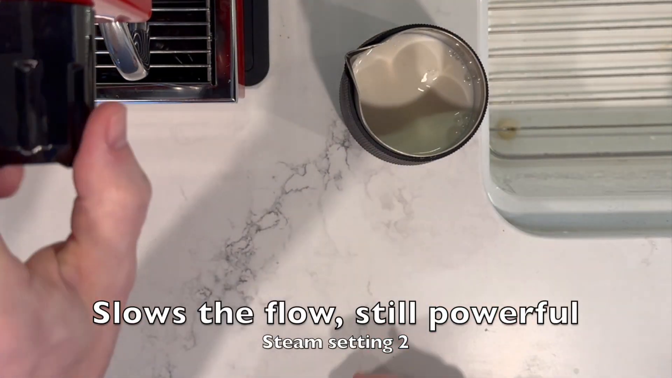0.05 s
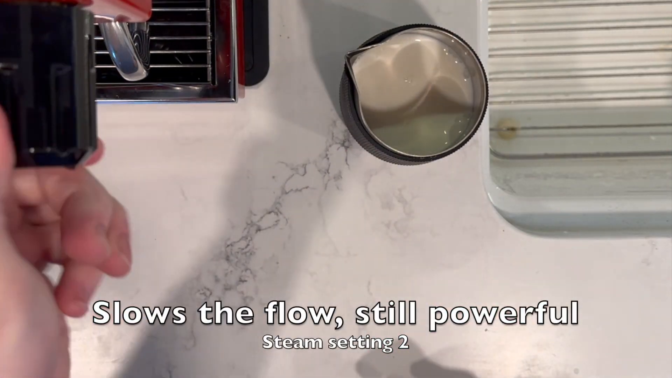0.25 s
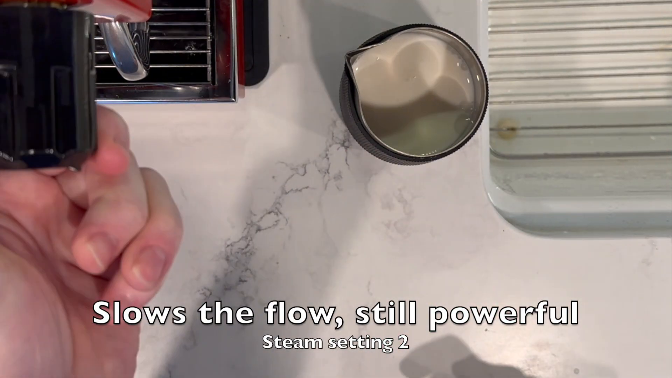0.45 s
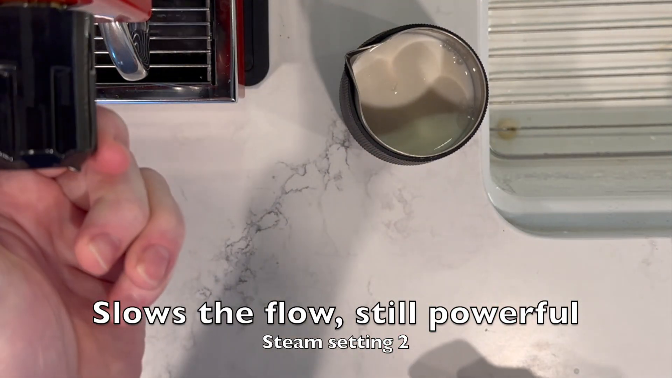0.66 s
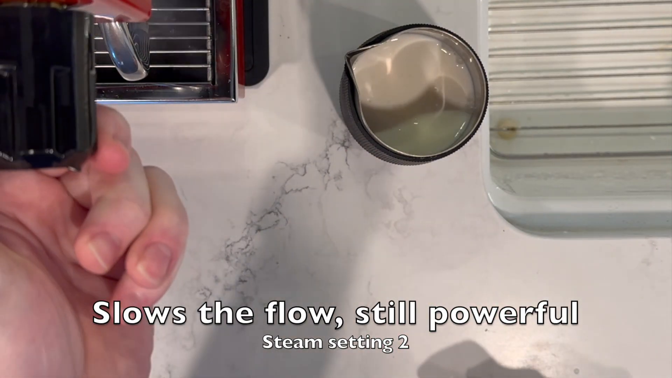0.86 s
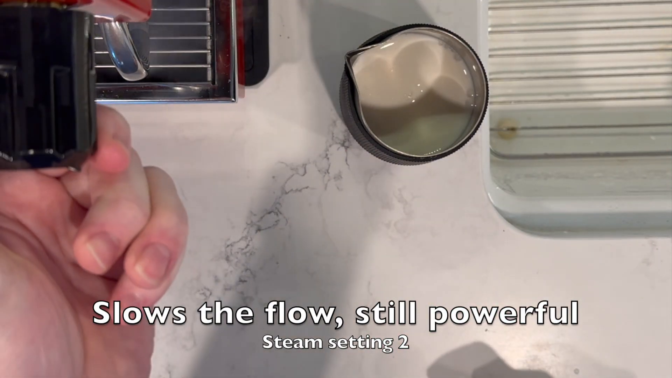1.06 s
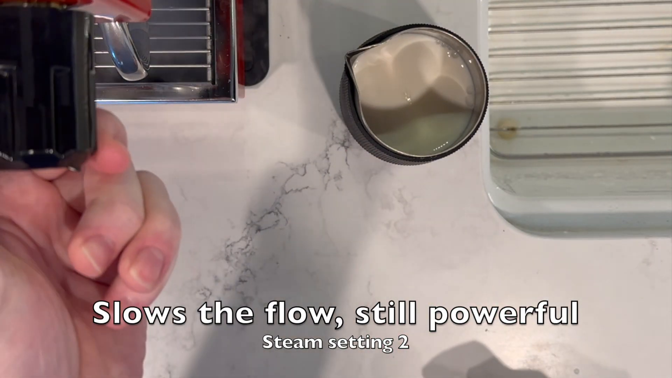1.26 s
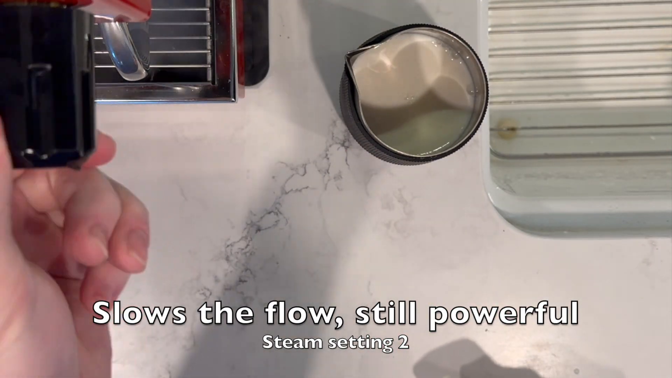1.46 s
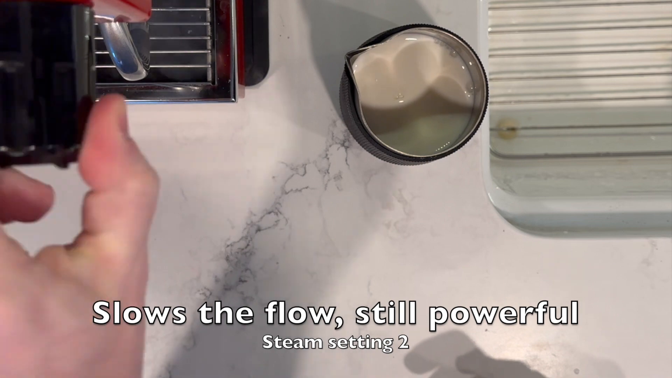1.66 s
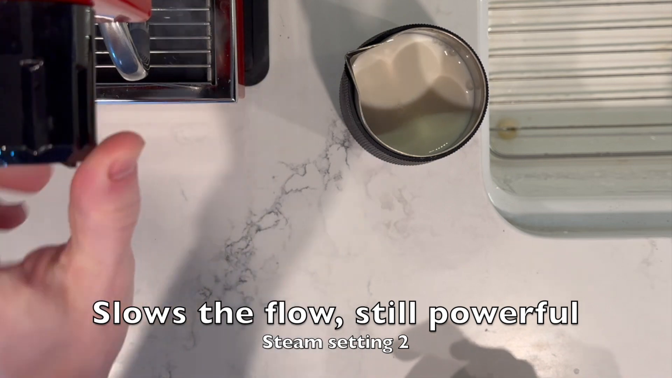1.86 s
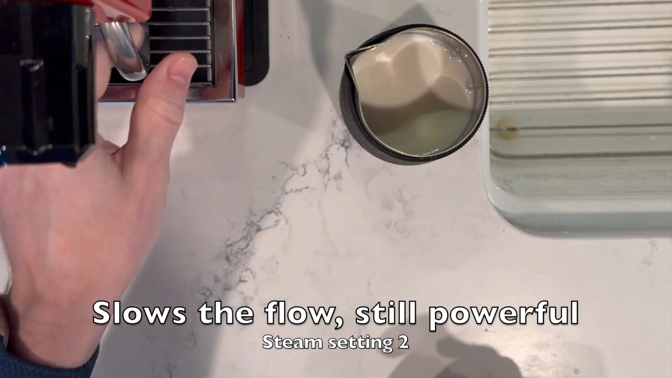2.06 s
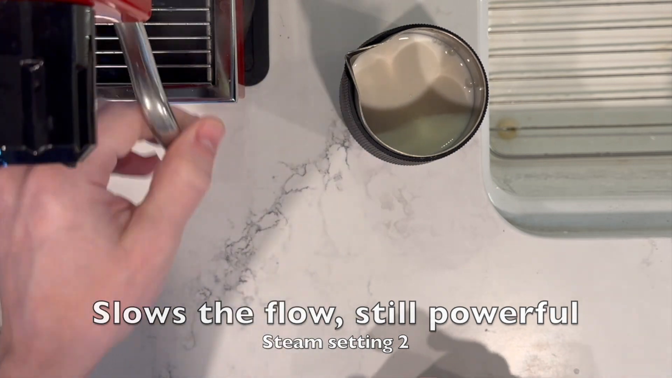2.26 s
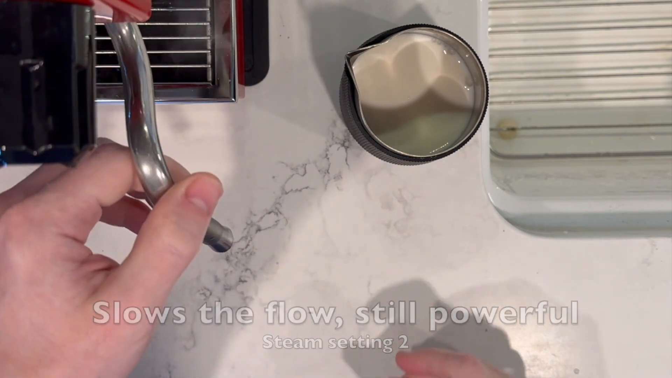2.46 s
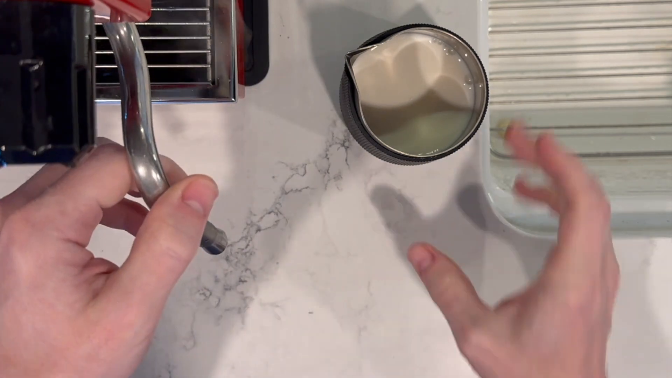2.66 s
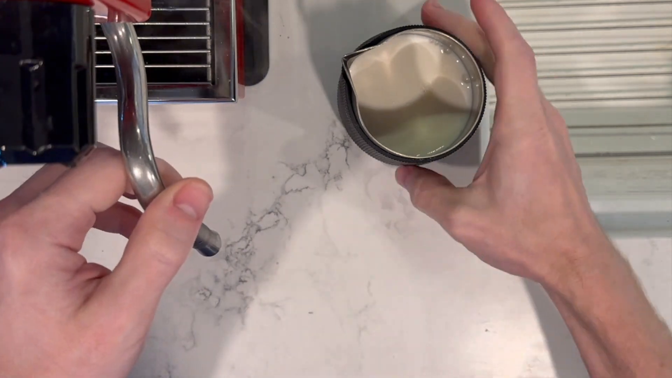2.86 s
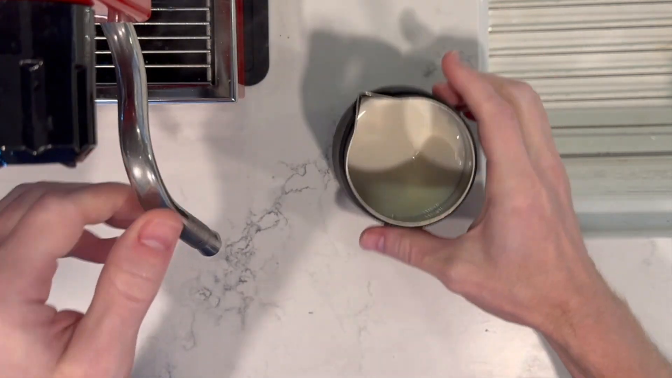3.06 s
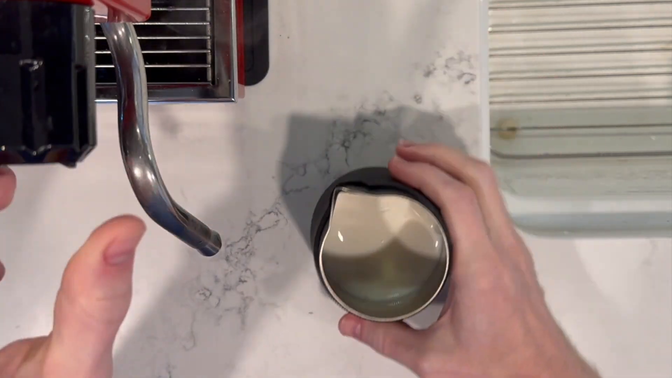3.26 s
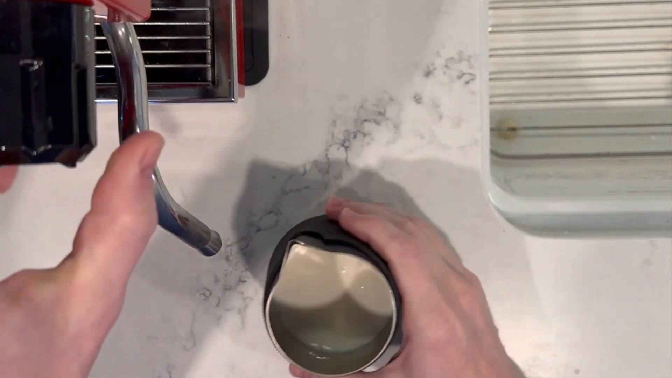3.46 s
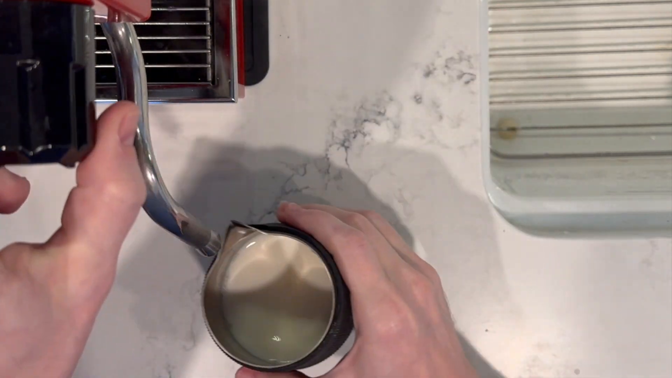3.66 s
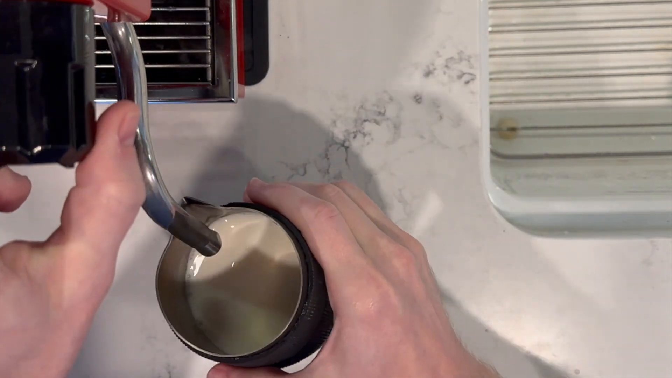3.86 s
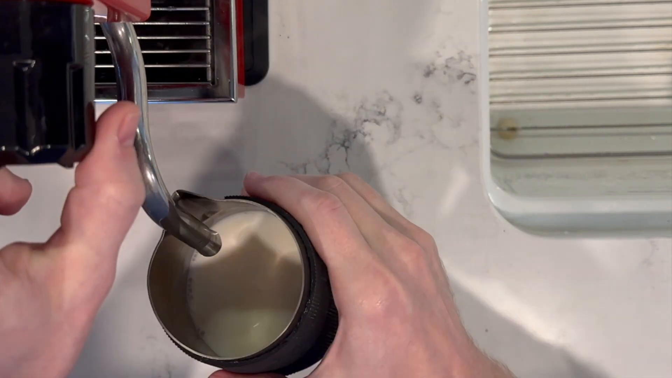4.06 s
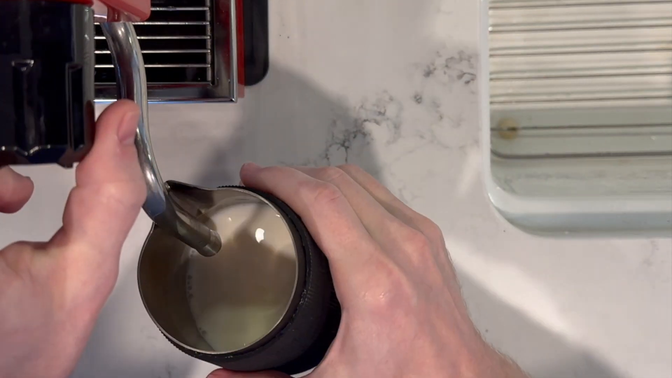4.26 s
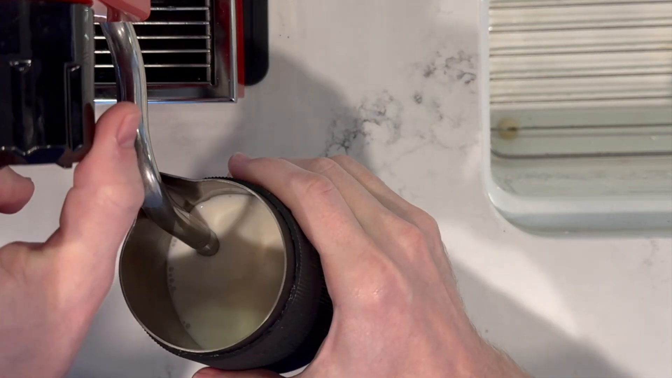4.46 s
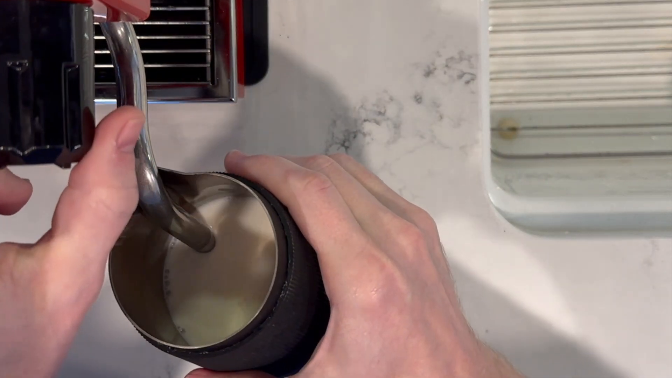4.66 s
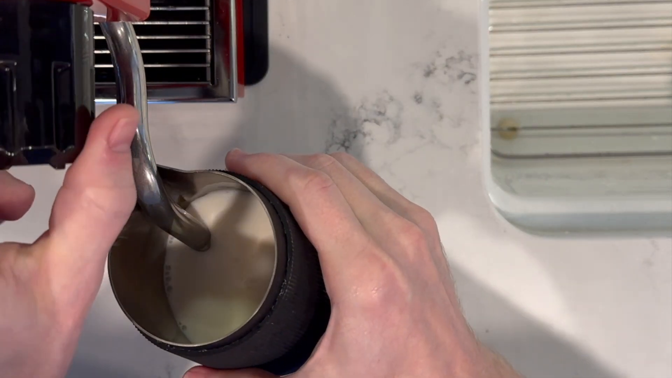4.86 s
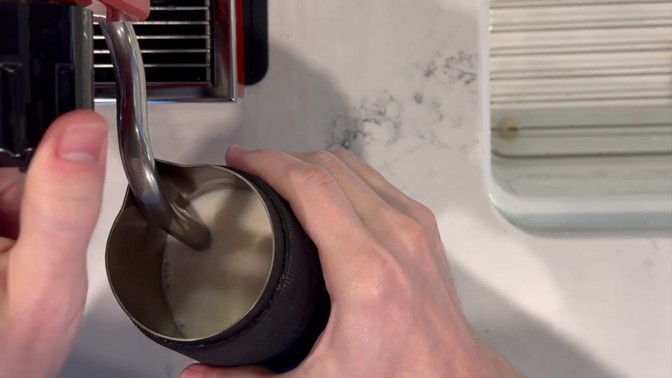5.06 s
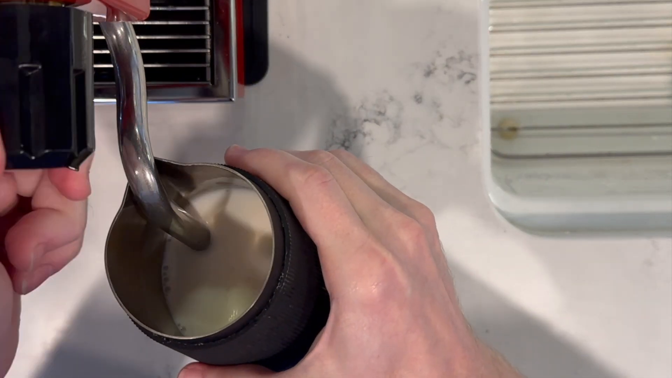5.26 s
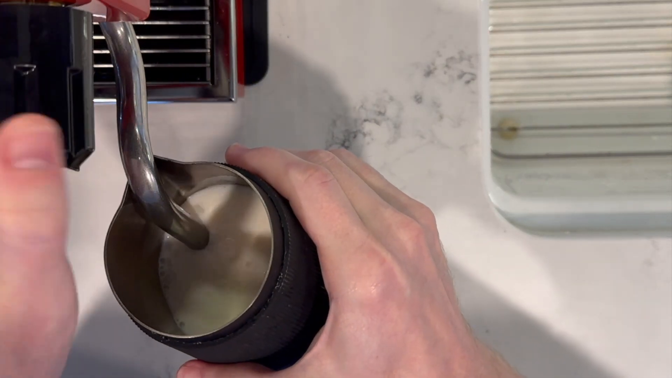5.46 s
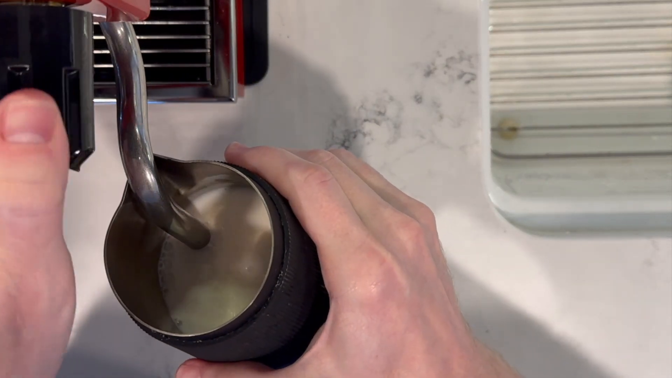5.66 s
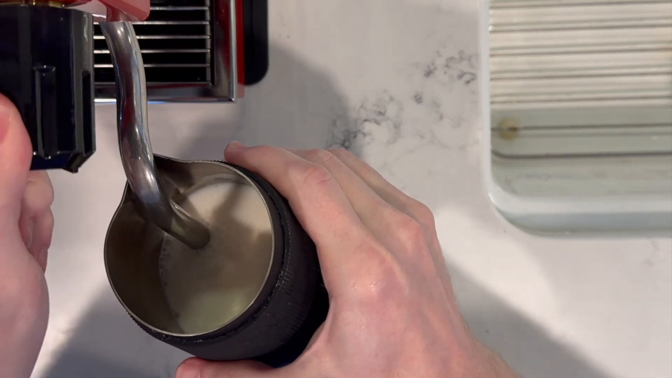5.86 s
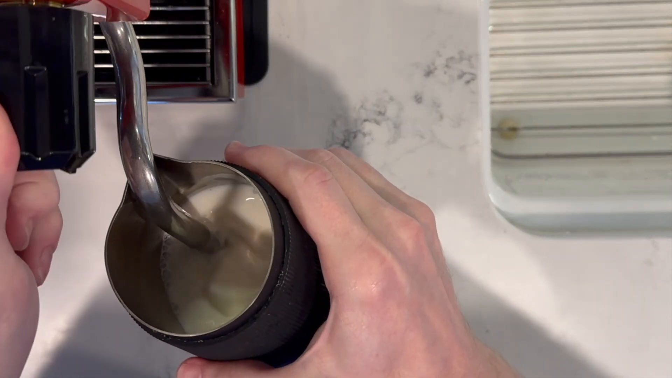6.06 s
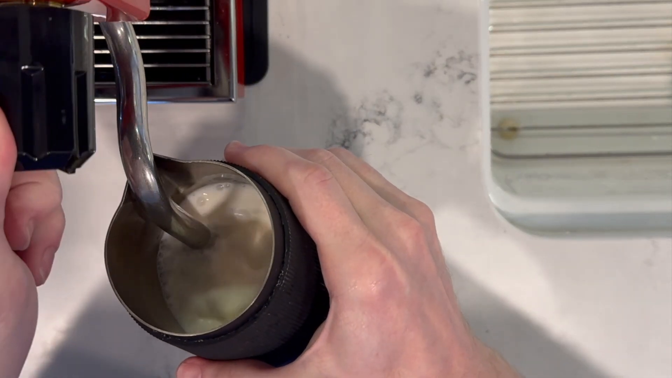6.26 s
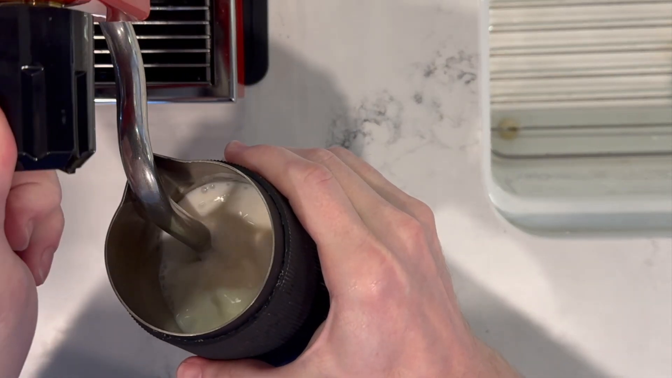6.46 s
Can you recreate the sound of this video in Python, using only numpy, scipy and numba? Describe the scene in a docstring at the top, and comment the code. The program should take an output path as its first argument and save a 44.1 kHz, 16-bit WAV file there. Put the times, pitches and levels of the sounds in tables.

```python
"""A kitchen, just above the counter: an espresso machine. A knob clicks, the steam wand sputters water and is purged
into the drip tray (filtered noise), a steel pitcher slides over (slip grains through its base modes) and the wand
knocks it (decaying modes). Then steam enters the liquid: collapsing bubbles, grains through moving resonances, rise
from a gurgle to a screech, ring the air in the pitcher, and the tip spits bursts of noise at the surface."""
import sys
import numpy as np
from scipy import signal
from scipy.fft import rfft, irfft
from scipy.io import wavfile
from scipy.ndimage import uniform_filter1d
from numba import njit

SR = 44100
rng = np.random.default_rng(int(sys.argv[2]) if len(sys.argv) > 2 else 0)


def unload_audio(sound):
    """Save the sound as a 16-bit wav file, at the path given as the first command line argument."""
    columns = np.transpose(np.atleast_2d(sound))
    # keep every value between -1 and 1, then stretch to whole-number steps
    steps = np.round(np.clip(columns, -1, 1) * 32767)
    wavfile.write(sys.argv[1], SR, steps.astype(np.int16))


N = 287085
TIME_S = np.arange(N) / SR


def undb(db):
    """Decibels to gain."""
    return 10 ** (np.asarray(db) / 20)


def unit(x):
    """Scale to rms 1."""
    return x / np.sqrt(np.mean(x ** 2))


def noise():
    """White noise."""
    return rng.standard_normal(N)


def curves(table):
    """Columns of a timed table, interpolated to every sample."""
    t_s, *columns = np.transpose(table)
    return [np.interp(TIME_S, t_s, column) for column in columns]


def over_hz(points, hz):
    """Read (f/Hz, value) points on a log-frequency axis."""
    f_hz, value = np.transpose(points)
    return np.interp(np.log(hz + 1), np.log(f_hz), value)


def colour(x, points, size=4096):
    """Causal minimum-phase filter with the given (f/Hz, gain/dB) response."""
    log_gain = np.log(undb(over_hz(points, np.fft.rfftfreq(size, 1 / SR))))
    cepstrum = irfft(log_gain)
    # fold the cepstrum onto positive time
    cepstrum[1:size // 2] *= 2
    cepstrum[size // 2 + 1:] = 0
    impulse = irfft(np.exp(rfft(cepstrum)))
    return signal.fftconvolve(x, impulse)[:len(x)]


@njit
def svf(x, hz, width_hz):
    """State-variable band-pass whose centre and width move."""
    y, b, l = np.empty(len(x)), 0., 0.
    for i in range(len(x)):
        g, k = np.tan(np.pi * hz[i] / SR), width_hz[i] / hz[i]
        v = (b + g * (x[i] - l)) / (1 + g * (g + k))
        b, l, y[i] = 2 * v - b, l + 2 * g * v, k * v
    return y


def band(x, hz, width_hz):
    """One resonance, fixed or moving."""
    ones = np.ones(len(x))
    return svf(x + 1e-18, hz * ones, width_hz * ones)  # offset avoids denormals


def band2(x, hz, width_hz):
    """Two equal resonances in series: steeper skirts."""
    return band(band(x, hz, width_hz), hz, width_hz)


def walk(points_per_s):
    """Smooth random wander, rms 1."""
    points = rng.standard_normal(2048)
    return unit(np.interp(TIME_S * points_per_s % len(points), np.arange(len(points)), points))


def grains(per_s, spread_db):
    """Random tiny impulses of uneven size, rms 1."""
    hits = rng.random(N) < per_s / SR
    return unit(hits * noise() * undb(spread_db * noise()))


def gate(start_s, length_s, rise_s, fall_s):
    """Opens at start, holds, then dies away."""
    opening = np.clip((TIME_S - start_s) / rise_s, 0, 1)
    return opening * np.exp(-np.maximum(TIME_S - start_s - length_s, 0) / fall_s)


def swell(peak_s, rise_db_per_s, fall_db_per_s):
    """Gain that grows steadily up to a moment and fades after it."""
    before_s, after_s = np.maximum(peak_s - TIME_S, 0), np.maximum(TIME_S - peak_s, 0)
    return undb(-rise_db_per_s * before_s - fall_db_per_s * after_s)


def add(track, start_s, x):
    """Mix a short sound in at a time."""
    i = int(start_s * SR)
    track[i:i + len(x)] += x[:N - i]


def click(hz, decay_s=0.0026, relative_width=0.36):
    """Brief noise burst around one pitch."""
    t_s = TIME_S[:SR // 5]
    return unit(band(rng.standard_normal(len(t_s)), hz, relative_width * hz)) * np.exp(-t_s / decay_s)


# plume part unrelated between left and right: f/Hz, relative level/dB
PLUME_WIDTH = [(150, -25.5), (700, -6.5), (2000, -9.5), (5000, 0.5), (8000, -17.5), (11000, -22),
               (15000, -15)]


def wide(source, width_db=0):
    """A plume is no point: its eddies reach left and right partly unrelated."""
    common = source()
    return common + undb(width_db) * colour(source(), PLUME_WIDTH) * np.array([[1], [-1]])


# reverberation: f/Hz, T60/s
KITCHEN_T60 = [(100, 0.44), (1000, 0.74), (5000, 0.61), (10000, 0.45), (16000, 0.319)]
# lead of the left microphone port over the right: f/Hz, phase/rad
PORT_PHASE = [(400, 0), (1000, .7), (2000, .8), (2900, 2.6), (4800, 4), (6500, 6.3), (8300, 8.9),
              (10300, 6.6), (13200, 6.2), (15000, 4.5)]
NEAR_DECAY_S = .004


def kitchen(x, side, near_db, room_db, shared_hz=750):
    """Direct sound, quick reflections off counter and machine, room tail; both channels share the bass."""
    t_s = TIME_S[:SR * 3 // 4]
    hz = np.fft.rfftfreq(len(t_s), 1 / SR)
    edges_hz = np.linspace(0, SR / 2, 32)
    near, late = rng.standard_normal((2, 2, len(t_s)))
    late, tail = rfft(late), 0
    apart = hz / np.hypot(hz, shared_hz)
    for lo, hi in zip(edges_hz, edges_hz[1:]):
        tau_s = over_hz(KITCHEN_T60, (lo + hi) / 2) / np.log(1000)
        tail = tail + irfft(late * ((hz >= lo) & (hz < hi)), len(t_s)) * np.exp(-t_s / tau_s)
    tail = tail * np.minimum(t_s / 0.006, 1) * np.sqrt(25 / SR)
    reflections = rfft(near * np.exp(-t_s / NEAR_DECAY_S)) * np.sqrt(2 / NEAR_DECAY_S / SR)
    early = 1 + undb(near_db) * reflections * apart
    # reflections ripple the spectrum finely but leave its broad shape
    early = early / np.sqrt(uniform_filter1d(np.abs(early) ** 2, size=50, axis=1))
    room = undb(room_db) * apart
    paths = (early + room * rfft(tail)) / np.hypot(1, room)
    paths = paths * undb(np.array([[.5], [-.5]]) * over_hz(side, hz))
    paths[1] *= np.exp(-1j * over_hz(PORT_PHASE, hz))  # right port lags
    lead = 32  # samples kept ahead of the direct sound
    response = np.roll(irfft(paths, len(t_s)), lead, axis=1)[:, :-SR // 10]
    return signal.fftconvolve(np.atleast_2d(x), response, axes=1)[:, lead:lead + N]


# room floor spectrum: f/Hz, relative level/dB
FLOOR = [(20, -30.5), (55, 1), (90, 1.5), (170, -7.5), (220, -16.5), (290, -16.5), (340, -20.5),
         (720, -27.5), (1000, -33.5), (1400, -31.5), (1700, -40.5), (3200, -46), (6500, -44.5),
         (10000, -62.5), (16000, -53.5)]
FLOOR_DB = -49.5


def background(apart_hz=600):
    """Low room rumble, alike in both channels, under a faint wide hiss."""
    mid, side = colour(noise(), FLOOR), colour(noise(), FLOOR)
    side = signal.sosfilt(signal.butter(1, apart_hz, "high", fs=SR, output="sos"), side)
    return undb(FLOOR_DB) * (mid + side * np.array([[1], [-1]])) / np.std(mid)


# knob click spectrum: f/Hz, relative level/dB
KNOB = [(300, -11), (1000, -19), (1700, -14), (2900, 1), (3900, -4.5), (5000, -10), (6300, -28), (8400, -2),
        (10000, -8), (12000, -14), (14000, -9), (15600, -9)]
KNOB_S, KNOB_DB, KNOB_DECAY_S = .1135, -34, 0.0014


def knob():
    """One dry plastic click as the valve knob leaves its seat."""
    return undb(KNOB_DB) * gate(KNOB_S, 0.00055, 0.00045, KNOB_DECAY_S) * unit(colour(noise(), KNOB))


# wand joint ticks: t/s, relative level/dB, f/Hz
TICKS = [(2.1258, -69, 5520), (2.218, -70, 13500), (2.236, -69, 10550), (3.624, -62.5, 5180),
         (4.004, -66, 9500), (4.2035, -52.5, 6700), (4.211, -56, 5100), (4.4648, -62, 3550),
         (4.684, -60.5, 4380), (4.8063, -65, 6840), (4.944, -54.5, 5960), (5.02, -63, 13100)]
# wand modes: f/Hz, relative level/dB, T60/s
WAND = [(4400, 3, 0.067), (5420, 9, 0.11), (7000, 2, .05)]
# hands moving the wand: t/s, length/s, level/dB
HANDLING = [(1.915, .07, -79), (2.09, 0.15, -76), (2.409, .05, -76), (3.859, 1.23, -80)]


def ticks(tick_db=9.0, ring_db=-19):
    """Small bright clicks ring the wand; fainter ones come while the hands move it."""
    out, t_s = np.zeros(N), TIME_S[:SR // 5]
    ring = sum(undb(ring_db + db - 60 * t_s / t60_s) * np.sin(2 * np.pi * hz * t_s) for hz, db, t60_s in WAND)
    for start_s, db, hz in TICKS:
        add(out, start_s, undb(db + tick_db) * (click(hz) + ring))
    handled = sum(undb(db) * gate(start_s, length_s, 0.011, .03) for start_s, length_s, db in HANDLING)
    return out + handled * unit(band(grains(220, 1.3), 10500, 7000))


# pitcher base modes: f/Hz, nominal width/Hz, relative level/dB
BASE = [(534, 154, 2), (710, 105, 1.5), (894, 260, -3), (1190, 89, -11), (2270, 110, -6), (3770, 300, -13),
        (5000, 250, -14), (5950, 250, -16), (7000, 350, -18), (8500, 800, -17.5), (11160, 1000, -18.5),
        (13800, 900, -19.5)]
# SLIDE_LENGTH_S: until the pitcher is lifted; rise and fall: speeding up, slowing down
SLIDE_S, SLIDE_LENGTH_S, SLIDE_RISE_S, SLIDE_FALL_S = 2.892, 0.48, 0.091, 0.14


def slide(slide_db=-58.5, judder_db=1.4, drift=0.0086, flutter_db=2.5):
    """Dense slips of steel on stone ring the pitcher base; each mode flutters as the contact shifts."""
    slips = grains(3000, 1.3) * undb(judder_db * walk(24.77))
    grip = np.exp(drift * walk(9.8))
    ring = 0
    for hz, width_hz, db in BASE:
        mode = band(band(slips, hz * grip, 1.4 * width_hz), hz * grip, 2.0 * width_hz)
        ring = ring + undb(db + flutter_db * walk(35)) * mode
    return undb(slide_db) * unit(ring) * gate(SLIDE_S, SLIDE_LENGTH_S, SLIDE_RISE_S, SLIDE_FALL_S)


# wand-pitcher contacts: t/s, relative level/dB, treble tilt/(dB/octave), crack decay/s, relative steel ring/dB
KNOCKS = [(2.471, -61, 2.5, 0.0038, -8.5), (4.079, -47, 1.5, 0.0078, -13), (4.085, -51.5, -2, 0.016, 0.5),
          (4.534, -36.5, -2, 0.012, -18), (4.541, -39.5, -2, 0.012, -1.5), (5.262, -44.5, -2, 0.033, -13)]
# steel modes of wand and pitcher: f/Hz, relative level/dB, T60/s
STEEL = [(575, 9.5, 0.14), (721, -3, .18), (867, 7, 0.15), (929, 0, 0.25), (1010, -1, 0.2), (1077, 2, 0.18),
         (1687, 2, 0.07), (2210, 1.5, 0.09), (2750, -15, 0.38), (2780, 9, 0.077), (2944, -1, 0.12),
         (3350, -9, 0.13), (4630, 2, 0.06), (5240, -15, 0.22), (6600, -8, .13)]
# crack spectrum: f/Hz, relative level/dB
CRACK = [(150, -18), (400, -21), (590, 0), (740, -4), (1000, -9), (1350, -13.5), (1750, -9.5),
         (2900, -11.5), (4500, -4.5), (6000, -13), (9000, -14.5), (12000, -21.5), (16000, -26)]
# dull low bumps: a soft thud before the first sputter, thuds and scuffs of hands and pitcher,
# the thump of a spit: t/s, length/s, level/dB, f/Hz
BUMPS = [(0.296, 0.024, -53, 770), (2.47, 0.023, -51, 877), (2.475, 0.055, -47, 189),
         (3.499, 0.012, -61.5, 1660), (3.511, 0.036, -55, 606), (4.082, 0.039, -50, 930),
         (4.085, 0.027, -56, 540), (6.422, 0.017, -42, 177)]


def knocks(ring_db=-4, crack_db=8):
    """Each contact cracks briefly and rings the steel; dull bumps are added."""
    out, t_s = np.zeros(N), TIME_S[:SR // 2]
    for start_s, db, tilt_db, crack_s, steel_db in KNOCKS:
        ring = 0
        for hz, mode_db, t60_s in STEEL:
            # grip and point of contact change each mode's strength
            decay = undb(mode_db + 2 * rng.standard_normal() - 60 * t_s / t60_s)
            ring = ring + decay * np.sin(2 * np.pi * (hz * t_s + rng.random()))
        crack = unit(colour(rng.standard_normal(len(t_s)), CRACK)) * np.exp(-t_s / crack_s)
        blow = undb(ring_db + steel_db) * ring + undb(crack_db) * crack
        blow = blow * np.minimum(t_s / (0.071 * crack_s), 1)
        tilt = [(hz, tilt_db * np.log2(hz / 1500)) for hz in (300, 9000)]
        add(out, start_s, undb(db) * colour(blow, tilt))
    for start_s, length_s, db, hz in BUMPS:
        out += undb(db) * gate(start_s, length_s, 0.003, 0.011) * unit(band2(noise(), hz, 0.51 * hz))
    return out


# jet hiss and tray roar spectra: f/Hz, relative level/dB
JET = [(900, -38), (1800, -12.5), (2500, -10), (2950, -4.5), (3300, 3), (3650, -6), (4100, 2), (5000, -4),
       (6300, -0.5), (7500, 2.5), (8700, 2), (10000, 5.5), (12300, -1.5), (14000, 3), (15600, 1)]
TRAY = [(29, -48.5), (50, -12), (90, -1.5), (140, -7.5), (200, -5.5), (253, -11.5), (295, -1.5), (349, -5),
        (420, -3.5), (510, -8.5), (610, -7), (760, -10.5), (930, -11.5), (1140, -4.5), (1290, 1), (1390, 0),
        (1510, -3), (1820, -11), (2400, -22), (3120, -46.5), (5280, -120)]
# condensed water spat out: t/s, length/s, relative level/dB
SPUTTERS = [(0.314, 0.024, -37), (0.346, 0.011, -28), (0.374, 0.014, -27.5), (0.404, 0.012, -26.5),
            (0.47, 0.018, -26.5)]
# water slugs choking the hiss: t/s, length/s, depth/dB
CHOKES = [(0.425, 0.039, -5), (0.59, 0.018, -11.5)]
# valve cracked open, turned up, shut; flow time constant, closing time
CRACKED_S, TURNED_S, SHUT_S = .351, 0.61, 1.556
BUILD_S, SHUTTING_S = 0.17, 0.16
CRACKED_DB, OPEN_DB = -29, -18.5


def purge(tray_db=-9.0, weak_roar_db=-2.5, flutter_db=1.53, buffet_db=2.0, sputter_db=-2, rush_db=5):
    """Wet spurts, then a dry jet that hisses at the tip and roars where it hits the drip tray."""
    throttled = np.exp(-np.maximum(TIME_S - TURNED_S, 0) / BUILD_S)
    valve = gate(CRACKED_S, 2, 0.0018, .01) * np.clip((SHUT_S - TIME_S) / SHUTTING_S, 0, 1)
    flow = valve * undb(OPEN_DB + (CRACKED_DB - OPEN_DB) * throttled)
    choked_db = sum(db * gate(start_s, length_s, 0.0041, 0.0039) for start_s, length_s, db in CHOKES)
    sputter = sum(undb(db) * gate(start_s, length_s, 0.0037, 0.0038) for start_s, length_s, db in SPUTTERS)
    hiss = undb(choked_db + flutter_db * walk(50)) * unit(colour(noise(), JET))
    # a throttled jet barely reaches the tray
    roar_db = tray_db + weak_roar_db * throttled ** 2 + buffet_db * walk(70.1)
    roar = undb(roar_db) * unit(colour(noise(), TRAY))
    # the wide turbulent plume ends up as flow squared
    rush = undb(rush_db) * flow * unit(band(noise(), 2000, 1513))
    droplets = unit(colour(grains(12000, 6.0), JET)) + undb(-11.5) * unit(colour(noise(), TRAY))
    return flow * (hiss + roar + rush) + undb(sputter_db) * sputter * droplets


# droplet bursts: t/s, relative level/dB, f/Hz
POPS = [(6.031, -21, 6540), (6.047, -21, 13800), (6.09, -21, 9300), (6.1275, -21, 3000),
        (6.3232, -26, 2980), (6.356, -21.5, 3850), (6.4537, -15.5, 13900), (6.4812, -21, 6150),
        (6.492, -24, 5500)]


def pops(pop_db=3):
    """Single droplets burst above the milk."""
    out = np.zeros(N)
    for start_s, db, hz in POPS:
        add(out, start_s, undb(db + pop_db) * click(hz))
    return out


# a tip hole comes clear: t/s, length/s, relative level/dB
WHISTLES = [(6.026, .06, -32), (6.043, .005, -23), (6.127, .005, -23), (6.146, .008, -28),
            (6.304, .008, -31), (6.434, .008, -20), (6.483, 0.013, -29)]
WHISTLE_HZ, WHISTLE_WIDTH_HZ = 14544, 600


def whistles():
    """Thin, very high edge tones of the bare steam holes."""
    bare = sum(undb(db) * gate(start_s, length_s, 0.002, 0.003) for start_s, length_s, db in WHISTLES)
    return bare * unit(band2(noise(), WHISTLE_HZ, WHISTLE_WIDTH_HZ))


# large bubbles, each pumping one pitcher air mode: t/s, relative level/dB, f/Hz
GULPS = [(5.551, -33.5, 820), (5.597, -25.5, 860), (5.662, -24.5, 1314), (5.703, -27, 1325),
         (5.735, -27, 885), (5.752, -25, 1315), (5.793, -23, 1322), (5.845, -31, 1325), (5.985, -31, 1327),
         (6.151, -35, 854), (6.21, -34.5, 846), (6.455, -30.5, 880)]
GULP_S = 0.011  # swell and fade


def gulps(waver=0.012):
    """Each large bubble swells one air mode into a short hollow note."""
    warped_s = np.cumsum(np.exp(waver * walk(60))) / SR
    out = 0
    for peak_s, db, hz in GULPS:
        envelope = np.exp(-((TIME_S - peak_s) / GULP_S) ** 2)
        out = out + undb(db) * envelope * np.sin(2 * np.pi * hz * warped_s)
    return out


# tip breaks the surface: t/s, length/s, relative level/dB, wet gush relative to spray/dB
SPITS = [(6.011, 0.09, -30, -1), (6.118, 0.039, -34, 0), (6.305, 0.0083, -34, -17),
         (6.354, 0.017, -24.5, -5.5), (6.427, 0.038, -23.5, -47), (6.476, 0.023, -29, -2)]


def spitting():
    """Strength of the steam that escapes each time the tip breaks the surface."""
    return sum(undb(db) * gate(start_s, length_s, 0.009, 0.0045) for start_s, length_s, db, _ in SPITS)


# spray and thump spectra: f/Hz, relative level/dB
SPRAY = [(2000, -10.5), (4000, -9.5), (6500, -1), (8300, 5), (9900, 10), (12000, 1.5), (14600, 6),
         (15800, 2.5)]
THUMP = [(40, -41), (90, 7), (190, -17.5), (400, 1.5), (900, -53), (2000, -58)]
# steaming starts, rising tip reaches the surface, mist is thickest
STEAM_S, SURFACE_S, MIST_PEAK_S = 5.311, 5.89, 6.04


def spits(tear_db=2, crackle_db=-5, mist_db=-32.0, thump_db=-22.5):
    """A fine mist grows as the tip nears the surface; steam tears through with spray, wet gush, soft thump."""
    droplets = noise() * undb(tear_db * walk(240)) + undb(crackle_db) * grains(550, 0.91)
    spray, thump = unit(colour(droplets, SPRAY)), unit(colour(noise(), THUMP))
    mist = undb(mist_db) * gate(STEAM_S, 2, 0.066, .01) * swell(MIST_PEAK_S, 31, 33)
    gush = 0
    for start_s, length_s, db, gush_db in SPITS:
        gush = gush + undb(db + gush_db) * gate(start_s, length_s, 0.0064, 0.0043)
    bursts = spitting() * (spray + undb(thump_db) * thump)
    return mist * spray + bursts + gush * unit(band2(noise(), 6900, 6000))


# bubbles shrink and grow more alike as steam picks up: t/s, f/Hz, pitch spread/Hz, relative level/dB
BUBBLES = [(5.32, 560, 460, -34), (5.375, 860, 760, -26), (5.43, 1400, 1100, -26.5),
           (5.48, 2300, 2120, -30), (5.62, 2470, 1700, -33), (5.68, 2490, 1100, -27),
           (5.83, 2560, 1200, -22), (5.9, 2510, 1300, -28.5), (6.0, 2680, 900, -23.5),
           (6.09, 2960, 980, -27), (6.21, 3234, 800, -26), (6.27, 3140, 880, -31.5),
           (6.315, 3200, 900, -32), (6.39, 2980, 900, -40.5), (6.445, 2970, 900, -35.5),
           (6.51, 3440, 950, -34)]
# bubbles pulsing in step: t/s, length/s, first f/Hz, relative level/dB, settling time to the cloud's pitch/s
SQUEALS = [(5.267, 0.01, 971, -31.5, 0.042), (5.28, 0.021, 580, -44, .04), (5.315, 0.005, 760, -35, .04),
           (5.318, 0.0084, 380, -35.5, 0.056), (5.336, 0.014, 490, -23.5, 0.19),
           (5.359, 0.033, 787, -22, 0.2), (5.394, .012, 1110, -27, 0.069), (5.41, 0.01, 1505, -29, .1),
           (5.429, 0.012, 1644, -24.5, 0.22), (5.48, 0.0074, 3390, -28, 0.23),
           (5.799, .012, 2280, -21.5, 0.03), (5.846, 0.015, 3340, -17, 0.043),
           (6.2, 0.023, 3385, -20.5, 0.036), (6.209, 0.011, 5200, -26, 0.045),
           (6.223, 0.0065, 4180, -23, 0.019), (6.299, 0.019, 3340, -18, 0.093),
           (6.47, 0.0046, 3336, -19, .04)]


def squeals(jitter=0.04063, rough_db=2.0):
    """Short rough chirps that glide towards the pitch of the bubble cloud."""
    pitch_hz = curves(BUBBLES)[0]
    waver, rough = np.exp(jitter * walk(700)), undb(rough_db * walk(400))
    out = 0
    for start_s, length_s, first_hz, db, settle_s in SQUEALS:
        unsettled = np.exp(-np.maximum(TIME_S - start_s, 0) / settle_s)
        hz = waver * (pitch_hz + (first_hz - pitch_hz) * unsettled)
        tone = np.sin(2 * np.pi * np.cumsum(hz) / SR)
        out = out + undb(db) * gate(start_s, length_s, 0.0022, 0.011) * tone
    return rough * out


def gurgle(x, depth_db, points_per_s):
    """Foam opens and closes over the tip: each third of an octave swells and sinks on its own."""
    hz, spectrum = np.fft.rfftfreq(N, 1 / SR), rfft(x)
    centres_hz = 1000 * 2 ** (np.arange(11) / 3)
    out = 0
    for one in np.eye(len(centres_hz)):
        share = np.interp(hz, centres_hz, one)
        out = out + irfft(spectrum * share, N) * undb(depth_db * walk(points_per_s))
    return unit(out)


# higher air modes rung by the bubbles: f/Hz, width/Hz, relative level/dB
OVERTONES = [(1676, 38, 7.5), (2270, 57, 6), (2400, 50, 3), (2578, 45, 6), (2850, 36, -3), (3126, 83, 3),
             (3330, 35, -12), (3530, 37, -11), (5260, 130, 23)]


def bubble_cloud(pitch_hz, spread_hz, throb_db=1.0, sing_db=-10, scatter=0.146, sing_width_hz=130, swirl=0.013):
    """Dense collapses ring a broad band, the biggest bubbles sing one after another, both ring the air above."""
    collapses = grains(9000, 1.7) * undb(throb_db * walk(90))
    crowd = band(band2(collapses, pitch_hz, spread_hz), pitch_hz, spread_hz)
    crowd = unit(crowd / np.sqrt(spread_hz))  # even power as the band narrows
    note_hz = pitch_hz * np.exp(scatter * walk(70) * spread_hz / pitch_hz)
    cloud = crowd + undb(sing_db) * unit(band2(noise(), note_hz, sing_width_hz))
    air = sum(undb(db) * band(cloud, hz * np.exp(swirl * walk(13)), width_hz) for hz, width_hz, db in OVERTONES)
    return cloud + air


# pitcher air modes at steaming start: f/Hz, nominal width/Hz, relative level/dB, change at the surface/dB
CAVITY = [(504.5, 25, -12, -5), (768.5, 30, -4.5, -3), (852, 30, 0.5, -3.5), (927, 34, -3.5, -2.5),
          (1271, 28.5, 1.5, -12.5)]
# tip hiss spectrum: f/Hz, relative level/dB
HISS = [(400, -19.5), (900, -6), (1700, 2.5), (3200, 7.5), (4100, 2), (4800, -1), (5400, 2.5), (6500, 1.5),
        (7500, 2.5), (8500, -2), (9800, 2), (11300, -17.5), (13000, -10), (16000, -24)]
HISS_S, HISS_RISE_S = 5.332, 0.071
GURGLE_DB, GURGLE_POINTS_PER_S = 3.4, 48  # foam patching the hiss
AIR_RISE_PER_S = 0.068  # air modes glide steadily upward


def steaming(cloud_db=-4, cavity_db=-32.0, cavity_fade_db_per_s=8, spit_ring_db=-11, hiss_db=-26,
             wander=0.046, surge_db=0.7, cavity_throb_db=3.0, slosh=0.018):
    """Collapsing steam bubbles ring the bubble cloud and the air above it, over the hiss of the tip."""
    pitch_hz, spread_hz, bubble_db = curves(BUBBLES)
    pitch_hz = pitch_hz * np.exp(wander * walk(60))
    valve, pressure = gate(STEAM_S, 2, 0.0042, .01), gate(STEAM_S, 2, 0.15, .01) ** 2
    cloud = bubble_cloud(pitch_hz, spread_hz)
    # the swirling surface keeps retuning the air above it
    swirl = np.exp(slosh * walk(22) + AIR_RISE_PER_S * (TIME_S - STEAM_S))
    surfaced = gate(SURFACE_S, 1, 0.037, .01)
    air = 0
    for hz, width_hz, db, change_db in CAVITY:
        mode_db = db + change_db * surfaced + cavity_throb_db * walk(40)
        air = air + undb(mode_db) * band2(noise(), hz * swirl, 2 * width_hz)
    # smaller bubbles stir the air less; every spit stirs it again
    stir = pressure * undb(cavity_db - cavity_fade_db_per_s * (TIME_S - STEAM_S))
    stir = stir + undb(spit_ring_db) * spitting()
    hiss_level = undb(hiss_db) * gate(HISS_S, 2, HISS_RISE_S, .01) * swell(SURFACE_S, 12.6, 27.0)
    hiss = hiss_level * gurgle(colour(grains(20000, 0.75), HISS), GURGLE_DB, GURGLE_POINTS_PER_S)
    return valve * undb(bubble_db + cloud_db) * cloud + stir * unit(air * undb(surge_db * walk(45))) + hiss


# left minus right at each place: f/Hz, level difference/dB
TRAY_SIDE = [(100, 1.5), (300, 1), (650, 4.5), (900, 0.5), (1300, 3.5), (1900, 2.5), (4000, 3.5),
             (6800, 3.5), (8500, 0.8), (15000, -0.5)]
PITCHER_SIDE = [(200, -2), (850, 6), (1400, 3), (2600, 0.5), (3400, 11.5), (5000, 8), (7000, 2), (11000, 0)]


def scene():
    """The drip tray and the pitcher each sound from their own place."""
    tray = kitchen(wide(purge), TRAY_SIDE, near_db=2, room_db=-7.0)
    milk = wide(steaming, width_db=-3.0) + squeals() + gulps()
    surface = whistles() + wide(spits, width_db=-2.0) + pops()
    pitcher = kitchen(milk + surface, PITCHER_SIDE, near_db=-0.5, room_db=-11.0)
    handling = kitchen(knocks() + ticks() + slide(), TRAY_SIDE, near_db=6.5, room_db=-10.0, shared_hz=1684)
    handling = handling + kitchen(knob(), TRAY_SIDE, near_db=-3.0, room_db=-10.0)
    floor = background() * undb(np.array([[.5], [-.5]]) * 1.3)  # left 1.3 dB up
    return tray + undb(3.0) * pitcher + handling + floor


TOP_HZ = 15850


def record(dry):
    """Steep elliptic low-pass cuts the top."""
    return signal.sosfilt(signal.ellip(10, .2, 80, TOP_HZ, fs=SR, output="sos"), dry)


dry = scene()
out = record(dry)
unload_audio(out)
```